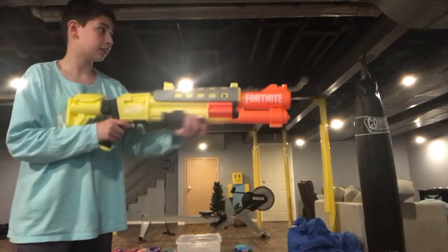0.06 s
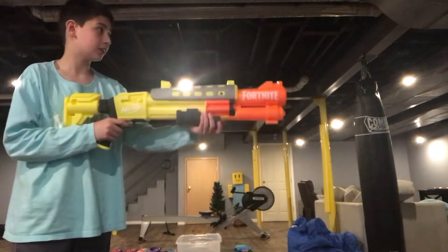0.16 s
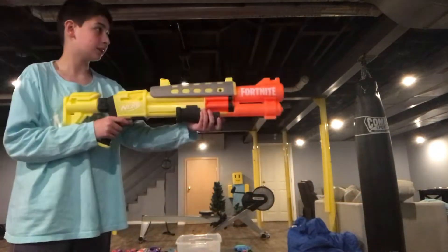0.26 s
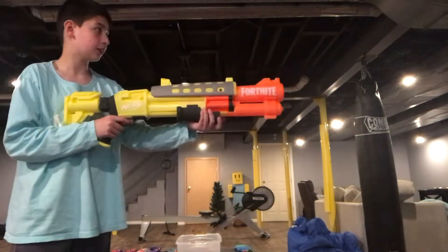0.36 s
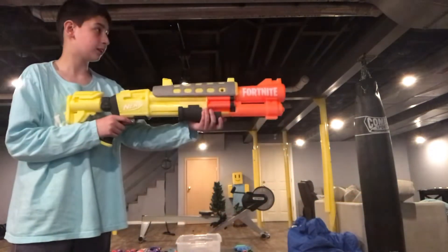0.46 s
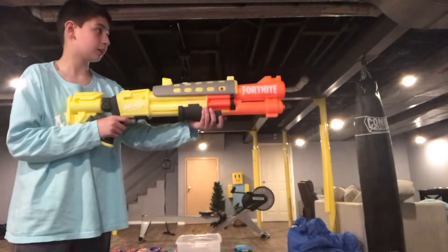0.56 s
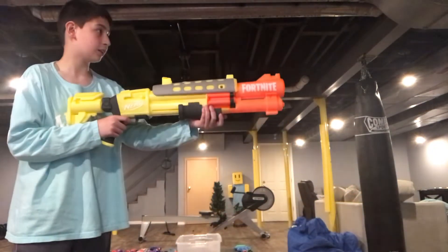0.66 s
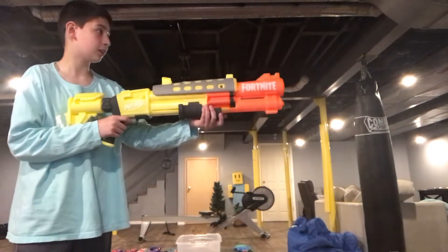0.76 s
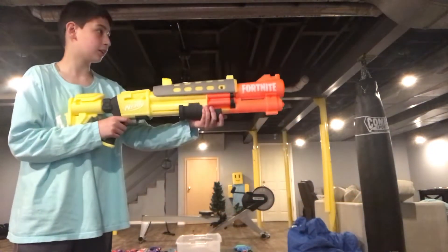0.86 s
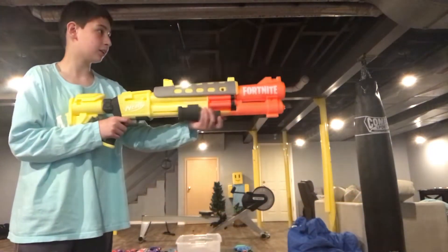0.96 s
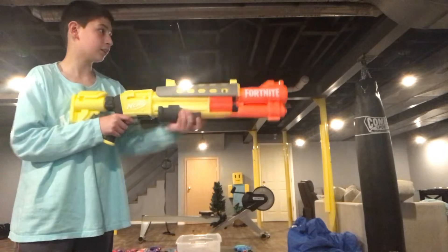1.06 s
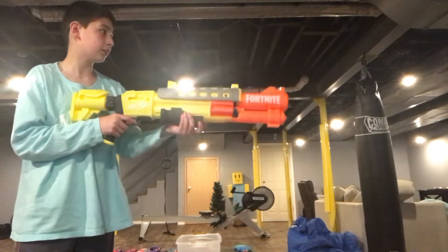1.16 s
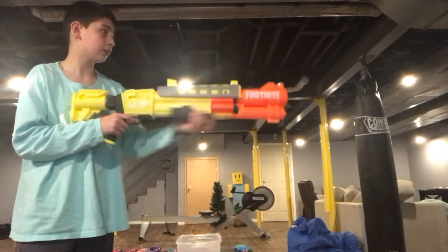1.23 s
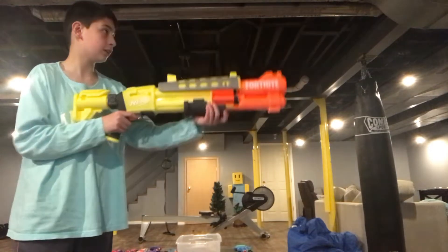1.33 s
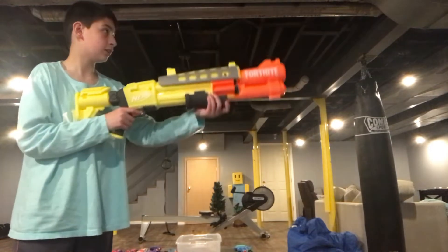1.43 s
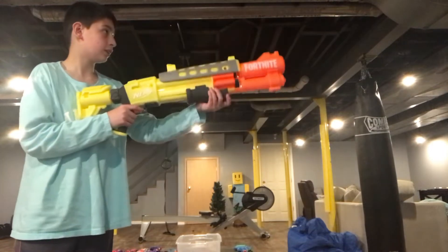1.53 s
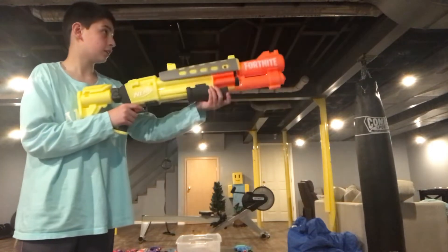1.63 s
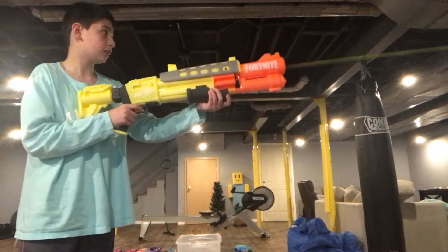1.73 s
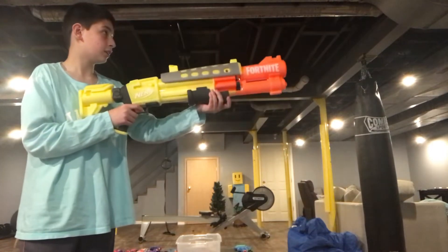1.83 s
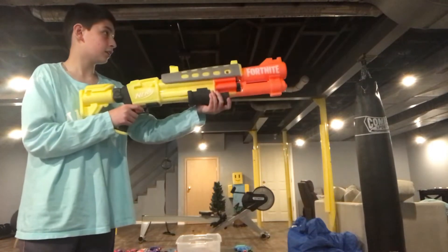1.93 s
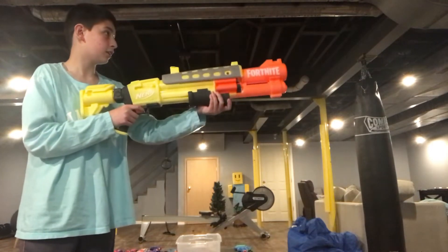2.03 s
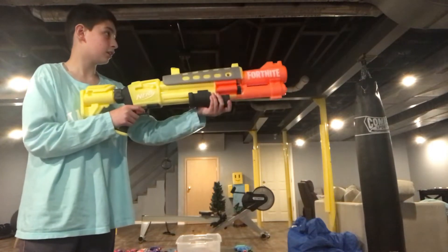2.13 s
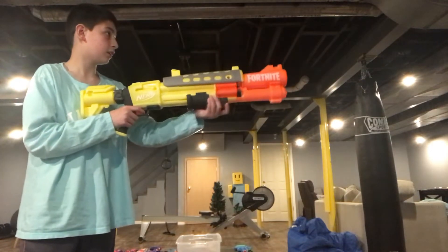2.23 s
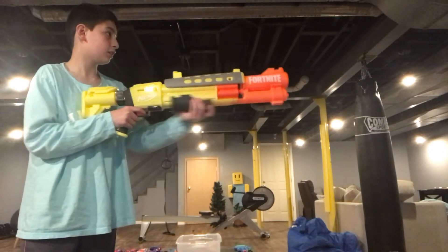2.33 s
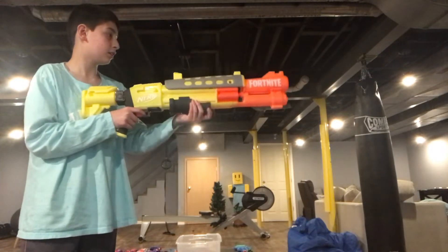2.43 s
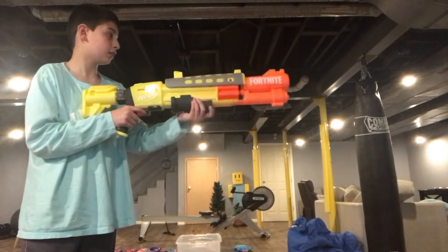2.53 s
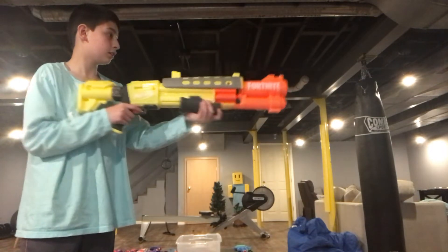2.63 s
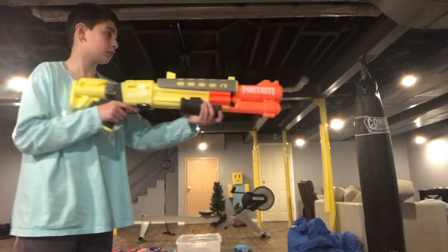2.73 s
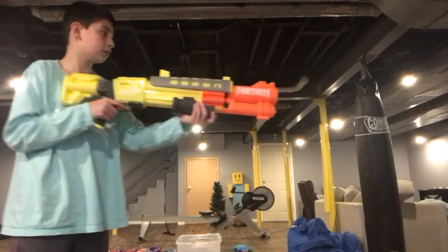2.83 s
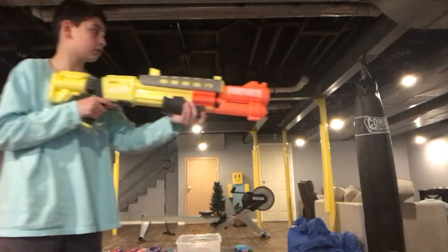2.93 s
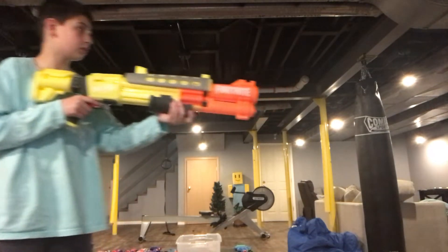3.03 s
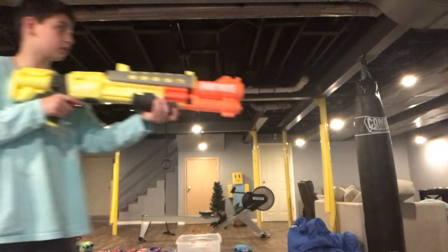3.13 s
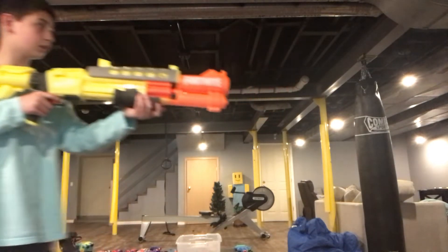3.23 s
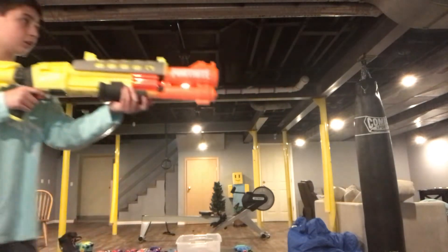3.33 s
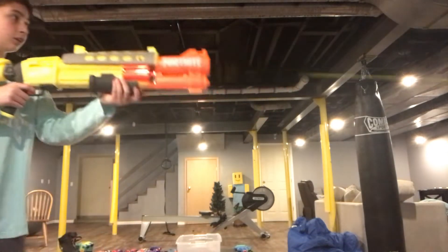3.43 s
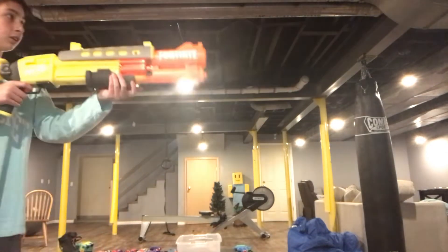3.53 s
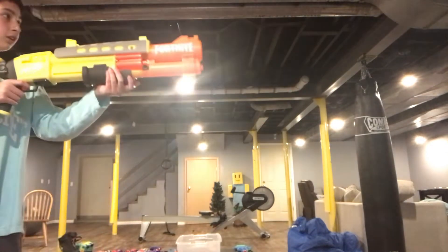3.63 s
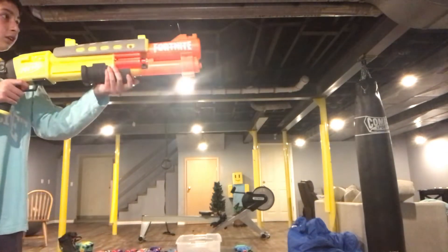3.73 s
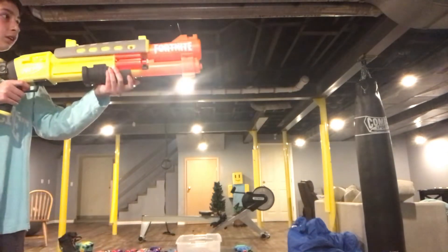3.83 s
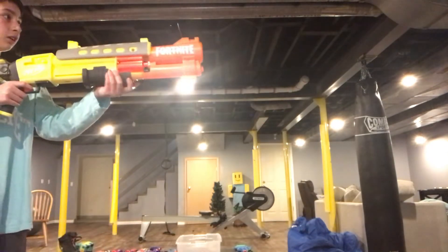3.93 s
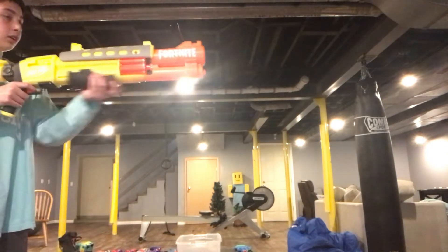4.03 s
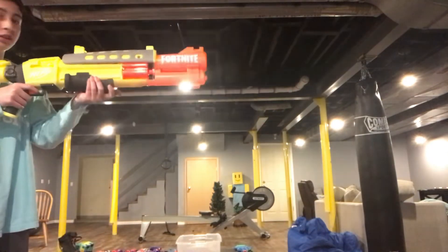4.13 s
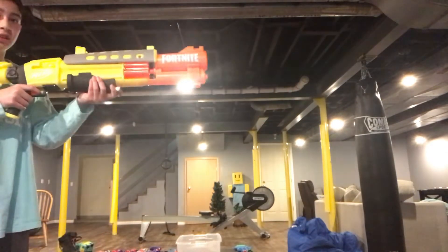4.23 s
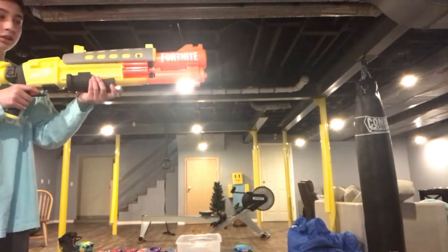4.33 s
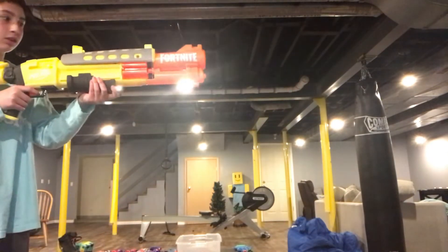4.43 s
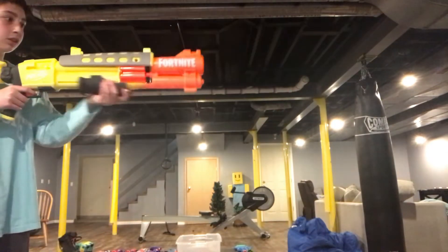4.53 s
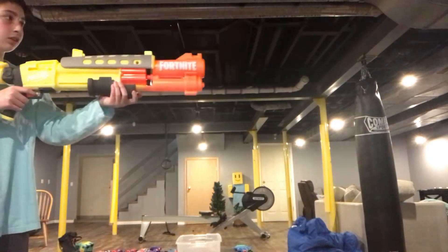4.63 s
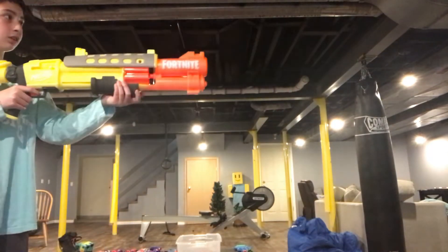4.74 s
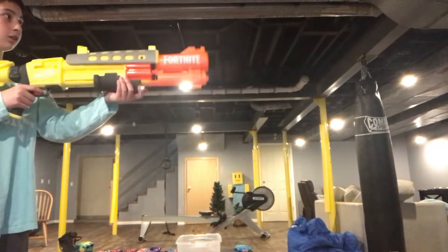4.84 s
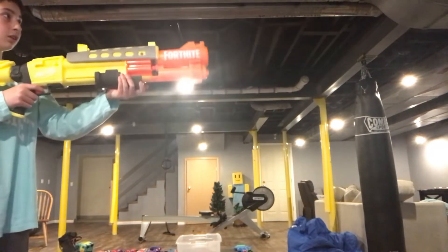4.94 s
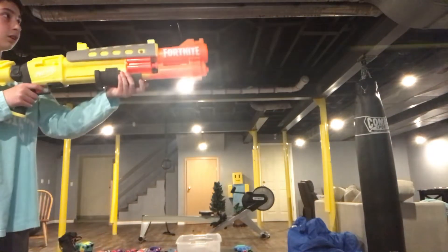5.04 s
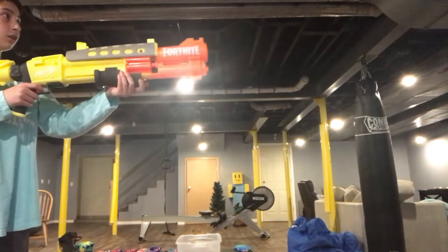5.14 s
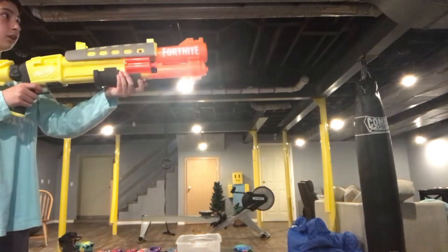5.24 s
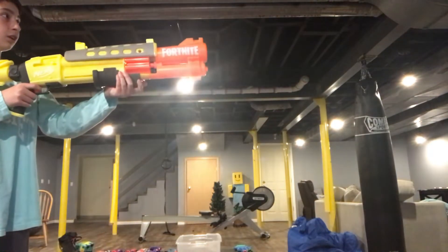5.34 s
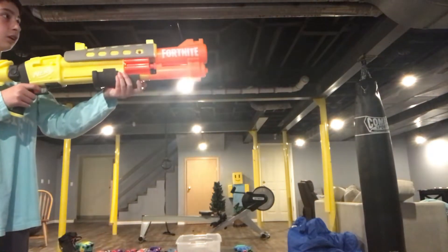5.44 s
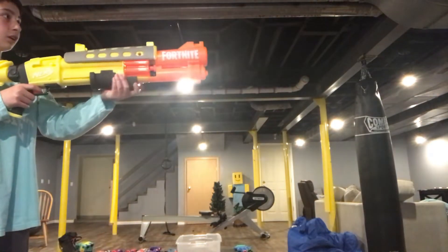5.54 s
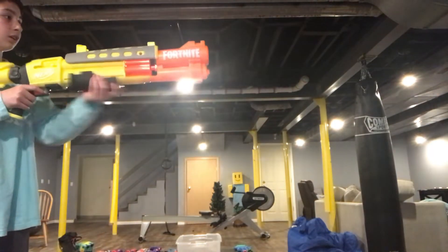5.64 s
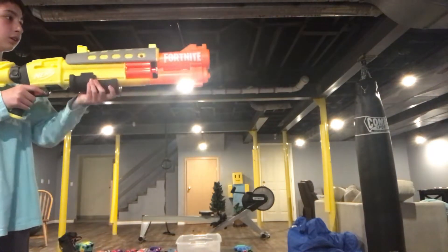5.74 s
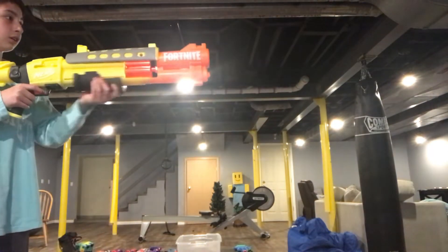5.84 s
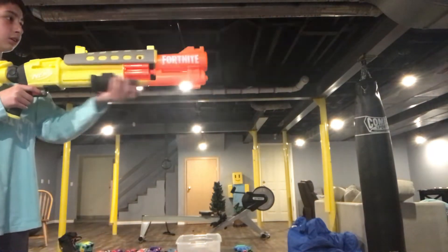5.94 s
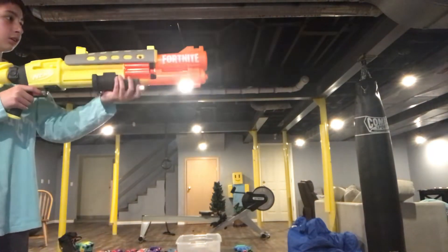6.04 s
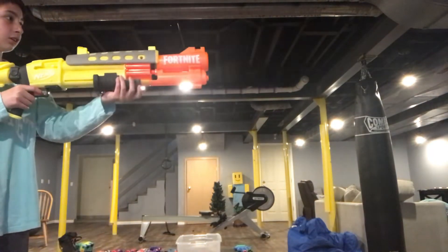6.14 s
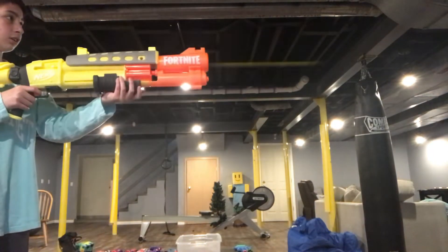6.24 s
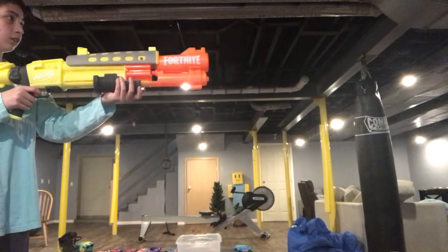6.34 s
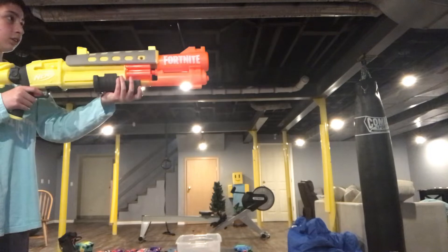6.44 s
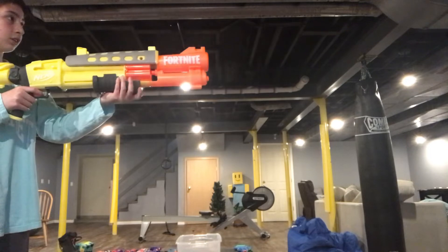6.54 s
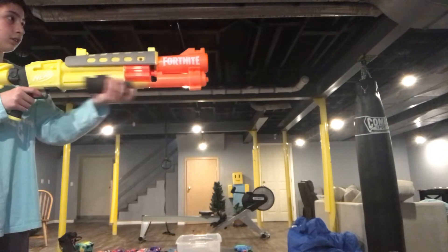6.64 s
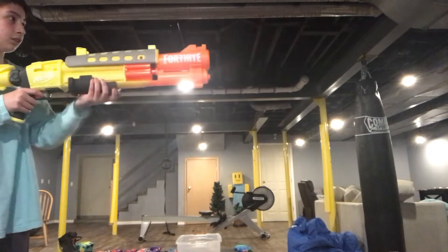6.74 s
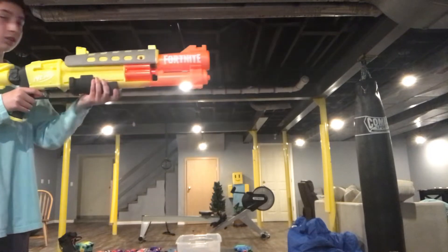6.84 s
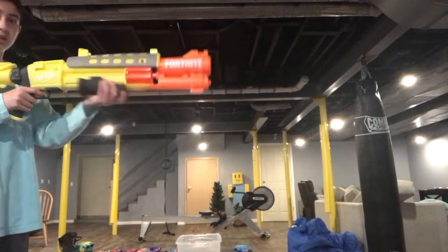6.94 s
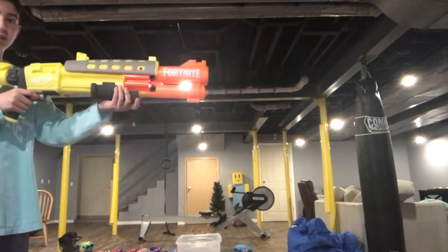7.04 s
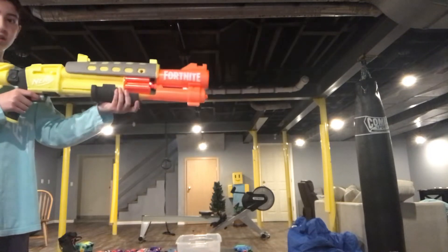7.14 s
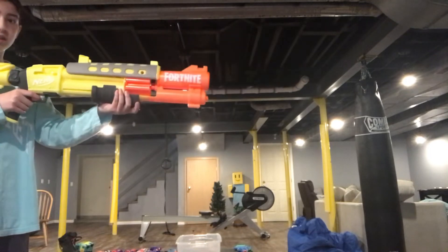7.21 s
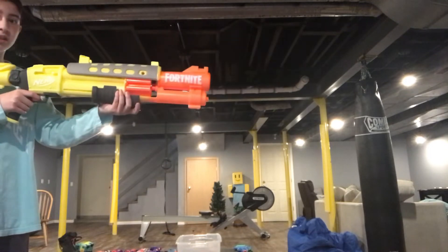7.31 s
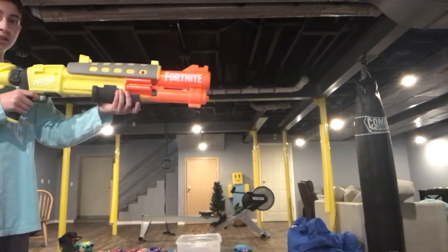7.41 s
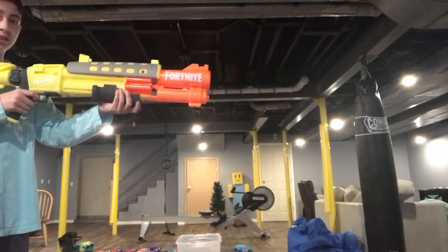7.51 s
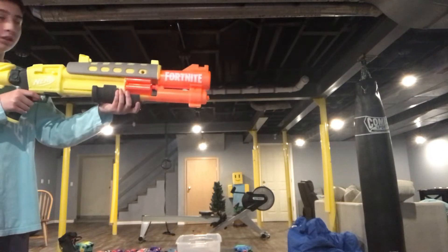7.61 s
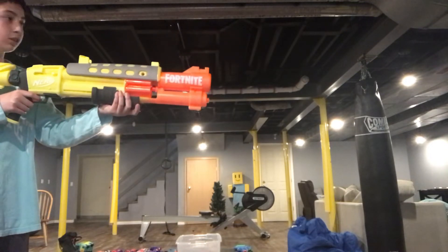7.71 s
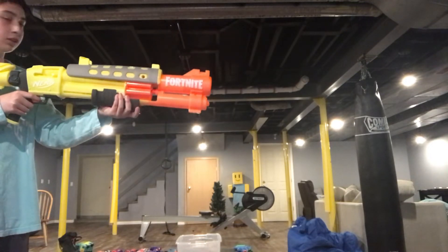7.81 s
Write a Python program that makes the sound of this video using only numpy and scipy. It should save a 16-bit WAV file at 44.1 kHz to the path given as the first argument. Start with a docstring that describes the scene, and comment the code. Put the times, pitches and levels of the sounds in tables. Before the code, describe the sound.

In a bare, reverberant basement, a hollow plastic pump-action toy blaster is worked close to the microphone. Its grip clicks quickly over a ratchet and clacks into its stop, the spring plunger rushes and slams, and about a third of a second later a foam dart smacks a distant panel. This repeats six times over a faint low hum, with small handling ticks between.

```python
"""A pump-action toy blaster of hollow plastic in a bare basement: the grip clicks over a ratchet, scrapes, and
bangs into its stops; the spring plunger rushes forward and slams; the foam dart smacks a far panel.
Ticks, soft noise swells and knocks lie between, over a steady hum. Impulses and noise bursts excite resonant or
coloured filters, damped tones add the notes, and early echoes, diffuse decay and low modes make the room."""
import sys
import numpy as np
from scipy import signal
from scipy.fft import rfft, irfft, next_fast_len
from scipy.io import wavfile
from scipy.ndimage import uniform_filter1d

SR = 44100
rng = np.random.default_rng(int(sys.argv[2]) if len(sys.argv) > 2 else 0)


def to_wav(sig):
    """Store sig (one row per channel, or 1-D mono) as 16-bit WAV at the path in sys.argv[1].

    Samples outside -1..1 are clipped; the rate is SR.
    """
    pcm = np.clip(np.atleast_2d(sig), -1, 1) * 32767
    pcm = np.round(pcm).astype(np.int16)
    wavfile.write(sys.argv[1], SR, pcm.T)  # frames by channels


N = 347067

# Grip strokes over the rack: first tooth t/s, first gap t/s, ratio of each gap to the last,
# first tooth to end stop t/s, first tooth level/dB, change per tooth level/dB, scrape level/dB,
# hollow rub level/dB, stop level/dB, stop knock level/dB
GRIP_STROKES = [(0.0832, .014, .8, .048, -12, -.5, -26.5, -31, -30, -11.5),
                (1.0118, .0125, .8, .0475, -17, .3, -27.5, -28, -17, -10),
                (1.2335, .0122, .95, .041, -14, -.6, -28.5, -32.5, -15, -11.5),
                (2.2852, .0123, .995, .0645, -15.5, .2, -29, -34, -19, -12),
                (2.6086, .0188, .88, .0685, -16, -.5, -28.5, -37, -20, -18),
                (3.9652, .013, 1.02, .077, -18, 1.4, -31, -33.5, -22, -24),
                (4.4798, .021, .92, .073, -10.5, -2.2, -31, -38, -20.5, -16.5),
                (5.5594, .0125, .93, .0535, -15.5, .4, -28.5, -32.5, -13, -7.5),
                (5.846, .0203, .91, .074, -11, -1.4, -34, -32, -18.5, -22),
                (6.6092, .013, .99, .064, -18, 1.2, -28, -35, -14.5, -8),
                (6.9205, .0168, .93, .061, -10, -1.4, -27.5, -34.5, -20, -16.5)]


def amp(db):
    """Level: 20 dB is a factor of ten in amplitude."""
    return 10 ** (np.asarray(db) / 20)


def along(points, hz):
    """Logarithmic frequency scale: (f/Hz, value) points are joined by straight lines on it."""
    f, v = np.transpose(points)
    return np.interp(np.log(hz + 1), np.log(f + 1), v)


def unit(x):
    """Root mean square: x is scaled to an rms of 1."""
    return x / np.sqrt(np.mean(x ** 2))


def filtered(x, response):
    """Linear filtering: x times a complex frequency response, scaled to keep the power of white noise."""
    size = next_fast_len(N + SR // 2)
    h = response(np.fft.rfftfreq(size, 1 / SR))
    h_rms = np.sqrt(np.mean(np.abs(h) ** 2))
    return irfft(rfft(x, size) * h / h_rms, size)[:N]


def resonant(x, modes):
    """Modal superposition: a body answers as a sum of band-pass resonances (f/Hz, width/Hz, level/dB)."""
    def response(f):
        total = 0
        for k, (centre, width, db) in enumerate(modes):
            mode = 1j * f * width / (centre * centre - f * f + 1j * f * width)
            total = total + (-1) ** k * amp(db) * mode  # neighbouring modes alternate in sign
        return total
    return filtered(x, response)


def coloured(x, spectrum):
    """Minimum phase: a folded cepstrum turns a magnitude spectrum into a causal filter of unit energy."""
    magnitude = amp(along(spectrum, np.fft.rfftfreq(4096, 1 / SR)))
    cepstrum = irfft(np.log(magnitude + 1e-6))
    cepstrum[1:2048] *= 2
    cepstrum[2049:] = 0
    kernel = irfft(np.exp(rfft(cepstrum)))
    return signal.fftconvolve(x, kernel / np.linalg.norm(kernel))[:N]


def snaps(times, levels_db):
    """Impulse excitation: single-sample pushes, which drive all frequencies equally."""
    push = np.zeros(N)
    push[np.round(np.asarray(times) * SR).astype(int)] = amp(levels_db)
    return push


def bursts(times, levels_db, t60, rise=0.0013):
    """Exponential decay: puffs of noise start at these times and fall by 60 dB in t60 seconds."""
    envelope, t = np.zeros(N + SR), np.arange(SR // 4) / SR
    for s, db in zip(times, levels_db):
        envelope[round(s * SR):][:len(t)] += amp(db - 60 * t / t60) * (1 - np.exp(-t / rise))
    return envelope[:N] * rng.standard_normal(N)


def swells(starts, ends, levels_db, climb_db, t60, rise=0.00037):
    """Exponential growth and decay: noise sets in, climbs by climb_db until the end time and then dies."""
    envelope, t = np.zeros(N), np.arange(N) / SR
    for a, b, db in zip(starts, ends, levels_db):
        shape_db = np.where(t < b, climb_db * (t - b) / (b - a), -60 * (t - b) / t60)
        envelope += amp(db + shape_db) * (1 - np.exp(-np.clip(t - a, 0, 1) / rise))
    return envelope * rng.standard_normal(N)


def notes(rows, t60, rise):
    """Damped oscillation: sine tones from rows of (t/s, level/dB, f/Hz) decay exponentially."""
    out, t = np.zeros(N + SR), np.arange(SR // 5) / SR
    for s, db, hz in rows:
        envelope = amp(db - 60 * t / t60) * (1 - np.exp(-t / rise))
        out[round(s * SR):][:len(t)] += envelope * np.sin(2 * np.pi * hz * t)
    return out[:N]


def handling():
    """Light contact: crisp ticks with a bright edge, short hollow notes and soft noise swells."""
    # Light ticks of hands, trigger and bouncing darts: t/s, level/dB, bright edge level/dB
    tick_rows = [(0.489, -45, -46.5), (1.656, -42, -56), (1.902, -47, -31), (3.012, -65, -49),
                 (3.097, -43, -52), (3.213, -46.5, -59), (3.239, -60, -50), (3.32, -47, -60),
                 (3.357, -48.5, -54), (3.883, -30.5, -26), (4.303, -41.5, -57), (4.433, -37.5, -42),
                 (4.714, -41.5, -27), (4.876, -49, -49), (4.921, -41, -48), (5.457, -32.5, -27.5),
                 (6.042, -55, -42), (7.547, -35, -39)]
    # Soft noise swells: room decay of an earlier sound at the opening, then hands shifting on plastic:
    # start t/s, end t/s, level/dB
    swell_rows = [(0, 0.048, -41), (0.05, 0.094, -46), (3.354, 3.42, -53), (3.915, 3.955, -35),
                  (4.42, 4.49, -46), (5.503, 5.58, -37), (6.143, 6.2, -46)]
    # Soft hollow knocks, as of loose darts shifting in their tubes: t/s, level/dB, f/Hz
    knock_rows = [(0.955, -24, 342), (1.129, -24.5, 332), (1.689, -28.5, 576), (2.206, -30, 594),
                  (2.241, -24.5, 587), (2.279, -21.5, 645), (2.292, -17.5, 610), (2.431, -27.5, 340),
                  (2.563, -30, 990), (3.961, -22, 615), (4.077, -25.5, 264), (5.559, -18, 556),
                  (5.661, -29, 680)]
    # Spectrum of the soft noise in swells and knocks: f/Hz, relative level/dB
    soft_spectrum = [(200, -4.5), (600, 2), (3000, -2.5), (7000, -10.5), (15000, -36)]

    s, tick_db, bright_db = np.transpose(tick_rows)
    tick = resonant(bursts(s, tick_db, t60=0.053), [(1190, 4800, 0.043), (2800, 5000, -1.6)])
    edge_push = snaps(s, bright_db + 12.5) + bursts(s, bright_db - 4.0, t60=0.017)
    edge = resonant(edge_push, [(5740, 1560, 5.5), (12500, 11000, -15.5)])
    soft_swell = coloured(swells(*np.transpose(swell_rows), climb_db=4.0, t60=0.03), soft_spectrum)
    knock_s, knock_db, _ = np.transpose(knock_rows)
    knock = notes(knock_rows, t60=0.058, rise=0.004)
    knock += coloured(bursts(knock_s, knock_db - 7, t60=0.034), soft_spectrum)
    return tick + edge + knock + soft_swell


def teeth():
    """Geometric spacing: gaps between teeth change by a steady ratio as the hand speeds up or slows."""
    tooth_count, scatter_db = 5, .8
    first, gap, ratio, run, db, step_db = np.transpose(GRIP_STROKES)[:6, :, None]
    k = np.arange(tooth_count)
    gaps = gap * ratio ** k
    s = first + np.cumsum(gaps, axis=1) - gaps
    level_db = db + step_db * k + scatter_db * rng.standard_normal(s.shape)
    before_stop = s < first + run
    return s[before_stop], level_db[before_stop]


def grip():
    """Ratchet impacts and stick-slip friction: clicks over a hollow scrape, then a clack that knocks the shell."""
    # Resonances of the pawl: f/Hz, width/Hz, relative level/dB
    pawl_modes = [(1440, 740, -16), (3020, 365, 16), (4640, 1200, -47), (5960, 990, -10.5),
                  (6340, 2040, 6.5), (12740, 12000, -8)]
    # Resonances of the hollow shell: f/Hz, width/Hz, relative level/dB
    shell_modes = [(331, 37.7, 1.5), (617, 88, 3.5), (824, 450, -1.5), (1680, 840, -6)]
    # Short notes of a struck tooth: f/Hz, level against the tooth/dB
    pawl_notes = [(2520, -8), (2940, -2), (3420, -7)]
    # Spectrum of the scrape: f/Hz, relative level/dB
    scrape_spectrum = [(590, -40), (1000, -35), (2200, 4.5), (2650, 10), (4730, 3), (7020, 4.5),
                       (9280, -6.5), (13100, -3), (16000, -4.5)]
    lead_s, note_scatter_db = .009, 2.5  # the grip moves for lead_s before the first tooth

    first, _, _, run, _, _, scrape_db, hollow_db, stop_db, knock_db = np.transpose(GRIP_STROKES)
    start, stop = first - lead_s, first + run

    s, db = teeth()
    scatter_db = note_scatter_db * rng.standard_normal((len(s), len(pawl_notes)))
    struck = []
    for at, level, row in zip(s, db, scatter_db):
        for (hz, note_db), d in zip(pawl_notes, row):
            struck.append((at, level + note_db + d, hz))
    ping = notes(struck, t60=.009, rise=.0002)
    strike = snaps(s, db - 1.5) + bursts(s, db - 5, t60=0.013, rise=.0003)
    clicks = ping + resonant(strike, pawl_modes)

    grit = amp(3 * unit(uniform_filter1d(rng.standard_normal(N), size=60)))  # stick and slip
    rub = grit * swells(start, stop, scrape_db, climb_db=11, t60=.03, rise=.008)
    scrape = coloured(rub, scrape_spectrum)
    hollow = grit * swells(start, stop, hollow_db, climb_db=8.5, t60=0.01, rise=0.0027)

    stop_hit = bursts(stop, stop_db, t60=0.045, rise=0.0015) + snaps(stop + .0015, stop_db + 9)
    clack = coloured(stop_hit, scrape_spectrum)
    knock = bursts(stop, knock_db, t60=0.026, rise=0.0016)
    return clicks + scrape + clack + resonant(hollow + knock, shell_modes)


def shots():
    """Air-column resonance and impact: air swells in the barrel, the plunger slams and the spring sings on."""
    # Shots: release t/s, plunger run t/s, slam level/dB, spring ring level/dB
    shot_rows = [(0.514, 0.018, -14.5, -35.5), (1.71, 0.016, -13, -30.5), (3.392, 0.017, -13.5, -32.5),
                 (4.953, 0.018, -13.5, -36.5), (6.194, .0135, -12.5, -34), (7.327, 0.02, -15, -34.5)]
    # Resonances of the barrel: f/Hz, width/Hz, relative level/dB
    barrel_modes = [(125, 46, -4), (286, 22.6, 0.5), (334, 35, -5.5), (539, 88, -4.5), (942, 95, -3),
                    (1580, 290, -26.5)]
    # Resonance of the spring: f/Hz, width/Hz, relative level/dB
    spring_modes = [(9420, 60, 0)]
    # Spectrum of the slam: f/Hz, relative level/dB
    slam_spectrum = [(590, -16), (1000, -13), (1240, -3.5), (3050, -1), (7610, -9), (10100, -17),
                     (15000, -9), (15900, -28), (16500, -33)]
    # air, slide, snap and ringing barrel against the slam
    rush_db, slide_db, snap_db, hollow_db = 0.53, -9.5, -8, -16

    release, run, slam_db, ring_db = np.transpose(shot_rows)
    slam = release + run
    air = swells(release, slam, slam_db + rush_db, climb_db=15.0, t60=0.025, rise=0.0037)
    rush = resonant(air, barrel_modes)
    rush += resonant(bursts(slam, slam_db + hollow_db, t60=0.29, rise=0.0028), barrel_modes)
    sliding = swells(release, slam, slam_db + slide_db, climb_db=8.5, t60=0.067, rise=0.0071)
    slide = coloured(sliding, slam_spectrum)
    hit = bursts(slam, slam_db, t60=0.066, rise=.002) + snaps(slam + .004, slam_db + snap_db)
    bang = coloured(hit, slam_spectrum)
    ring = resonant(bursts(slam, ring_db, t60=0.25, rise=0.014), spring_modes)
    return rush + slide + bang + ring


def landings():
    """Impact on a plate: the rubber tip cracks on the panel, which rattles and booms in its modes."""
    # Darts landing: t/s, smack level/dB, crack level/dB, thud level/dB
    landing_rows = [(0.803, -19, -7, -22.5), (1.9981, -18.5, 3, -27.5), (3.696, -18.5, -5.5, -24),
                    (5.2587, -18.5, -8, -23), (6.4986, -18, -6, -22.5), (7.6292, -21.5, -13, -24.5)]
    # Resonances of the panel: f/Hz, width/Hz, relative level/dB
    panel_modes = [(67, 16.6, 0.5), (139.6, 22, -1), (182, 49, 1), (305, 64, 1), (448, 70, -5.5),
                   (664, 150, -11)]
    # Spectrum of the smack: f/Hz, relative level/dB
    smack_spectrum = [(290, -17), (500, 4.5), (1810, 1), (3880, 5.5), (7060, -4.5), (8930, -10.5),
                      (12900, -16.5), (15600, -8), (16500, -45)]

    s, smack_db, crack_db, thud_db = np.transpose(landing_rows)
    tip_push = snaps(s, crack_db) + bursts(s, crack_db - 9.5, t60=0.01)
    crack = resonant(tip_push, [(7000, 2000, 0.013), (12900, 1100, 0.09)])
    smack = coloured(bursts(s, smack_db, t60=0.096), smack_spectrum)
    thud = resonant(bursts(s, thud_db, t60=0.22, rise=0.00077), panel_modes)
    return crack + smack + thud


def walls(x):
    """Specular reflection: early echoes return from floor, joists and posts."""
    echoes = np.zeros(SR // 20)
    for s, db in [(.0021, -41), (.0047, -63), (.0078, -1.5), (.0115, -4.5), (.0163, -17), (.022, 0.5), (.031, 2.5)]:
        echoes[round(s * SR)] = amp(db)
    return signal.fftconvolve(x, echoes)[:N]


def room(x):
    """Diffuse reverberation: the energy of each band is stored, dies at its own speed and returns as noise."""
    # Reverberation time of the room: f/Hz, t60 t/s
    room_t60 = [(100, 0.81), (260, 0.6), (700, 0.73), (1840, 0.75), (4850, 0.68), (12800, 0.36)]
    # Colour of the reverberation: f/Hz, gain level/dB
    room_colour = [(300, -3.5), (700, -0.75), (1500, -1.63), (3000, 3), (7000, 0.5), (15000, -0.5)]

    shape = dict(nperseg=512, noverlap=384)
    hz, t, z = signal.stft(x, SR, **shape)
    energy = uniform_filter1d(np.abs(z) ** 2, size=3, axis=0)
    # energy spreads over more neighbouring bands in the treble
    energy = np.where(hz[:, None] > 1200, uniform_filter1d(energy, size=25, axis=0), energy)
    keep = amp(-120 * t[1] / along(room_t60, hz))  # share of energy left after one frame
    # energy enters the store three frames late
    stored = np.array([signal.lfilter([0, 0, 0, 1 - k], [1, -k], e) for k, e in zip(keep, energy)])
    noise = signal.stft(rng.standard_normal(N), SR, **shape)[2]
    carrier = unit(np.abs(noise)) * np.exp(1j * np.angle(noise))
    gain = np.sqrt(np.abs(stored)) * amp(along(room_colour, hz))[:, None]
    return signal.istft(carrier * gain, SR, **shape)[1][:N]


def boom(x, t60):
    """Low reverberant decay: a new noise tail each quarter second, so that no single tail pattern repeats."""
    # Spectrum of the low notes that the room sustains: f/Hz, relative level/dB
    mode_spectrum = [(30, -13), (100, -4), (450, -3), (900, -13.5), (2000, -83)]
    wet, step, t = np.zeros(N + 2 * SR), SR // 4, np.arange(SR) / SR
    for start in range(0, N, step):
        tail = amp(-60 * t / t60) * rng.standard_normal(SR)
        part = signal.fftconvolve(x[start:start + step], tail / np.linalg.norm(tail))
        wet[start:][:len(part)] += part
    return coloured(wet[:N], mode_spectrum)


def scene():
    """Superposition: near blaster, far darts, room and its steady hum add up."""
    # Spectrum of the hum: f/Hz, relative level/dB
    hum_spectrum = [(15, -29), (25, 12), (166, 10.5), (335, 2.5), (489, -5.5), (531, -7), (1520, -4.5),
                    (1890, -14), (2840, -8), (14400, -26.5), (16000, -24)]
    handle, fire, far, small = grip(), shots(), landings(), handling()
    # what each source sends into the room
    sent = amp(-5.5) * handle + amp(-7.5) * fire + amp(-1) * far + amp(-3.5) * small
    hum = amp(-56.5) * coloured(rng.standard_normal(N), hum_spectrum)
    space = amp(-11.5) * walls(sent) + room(sent) + amp(-16.5) * boom(sent, t60=0.6)
    return (handle + fire + far + small + space + hum)[None]


def record(dry):
    """Band limiting: the microphone loses deep bass; the recorder drops steeply and keeps nothing past its edge."""
    top_hz, edge_hz = 15800, 17150
    hz = np.fft.rfftfreq(N, 1 / SR)
    bass = (1j * hz / (1j * hz + 55)) ** 3  # three high-pass stages with a 55 Hz corner
    drop = amp(-22 * np.clip((hz - top_hz + 150) / 300, 0, 1))
    edge = np.clip((edge_hz - hz) / 300, 0, 1)
    return irfft(rfft(dry) * bass * drop * edge, N)


dry = scene()
out = record(dry)
to_wav(out)
```